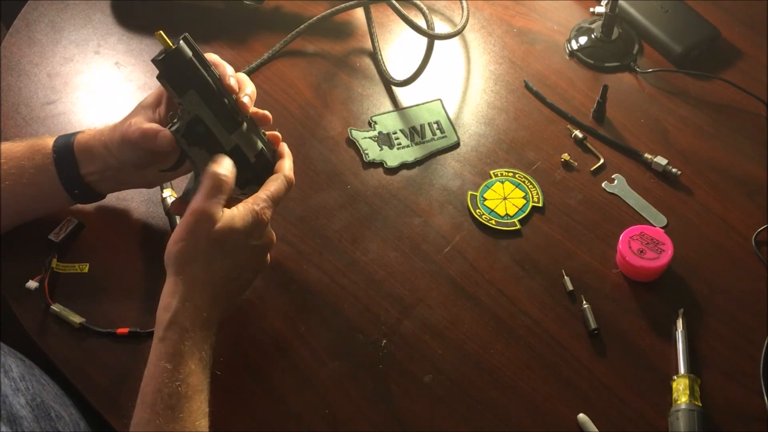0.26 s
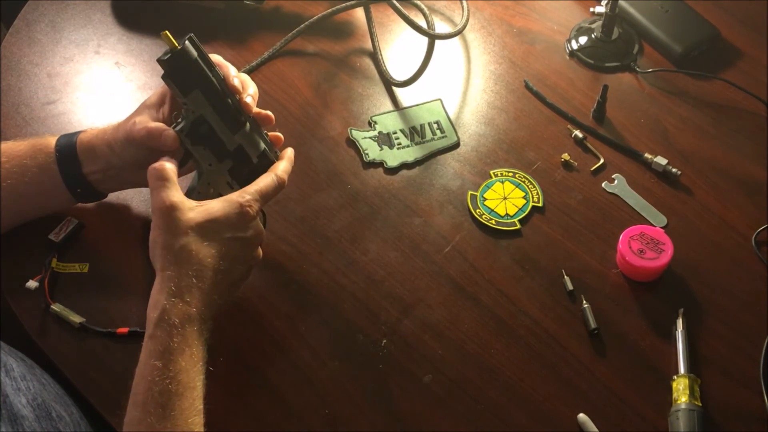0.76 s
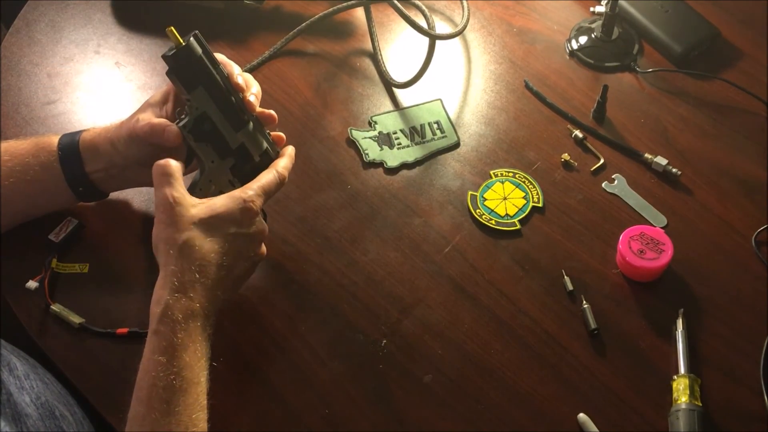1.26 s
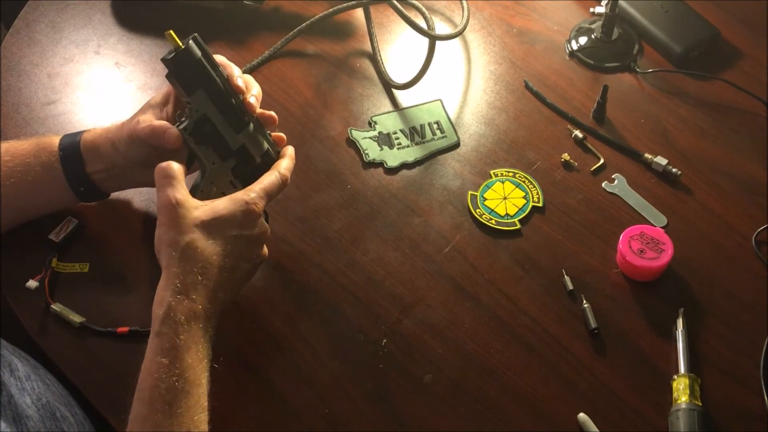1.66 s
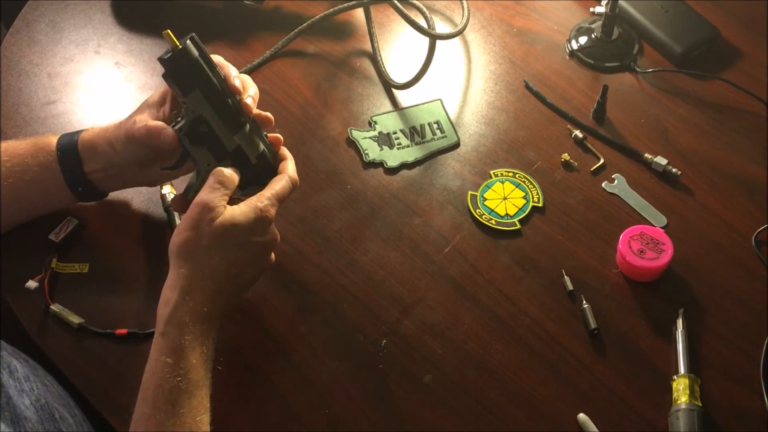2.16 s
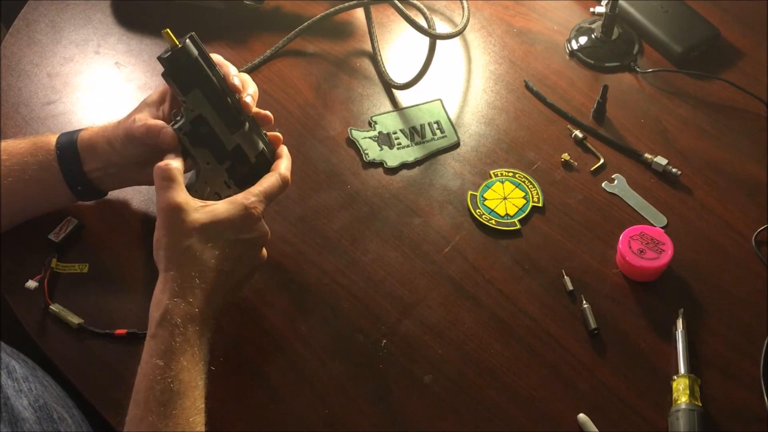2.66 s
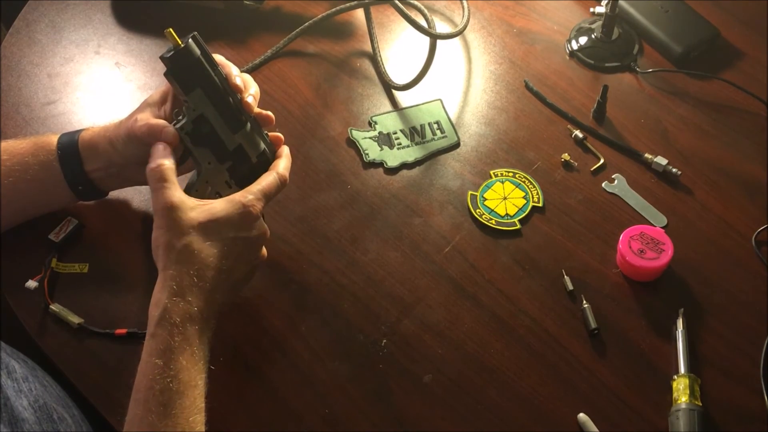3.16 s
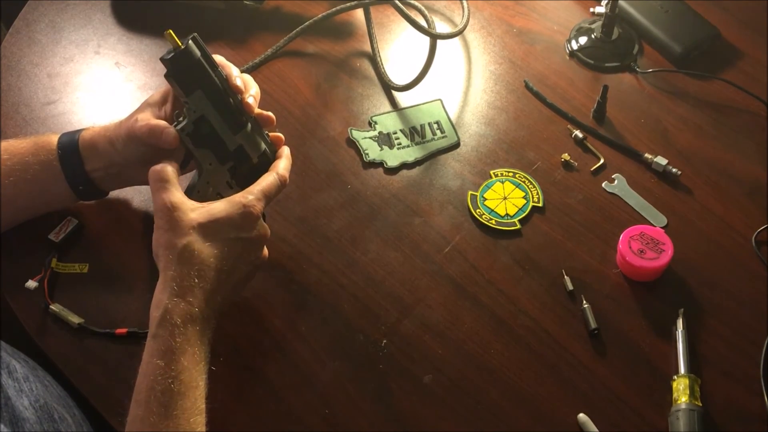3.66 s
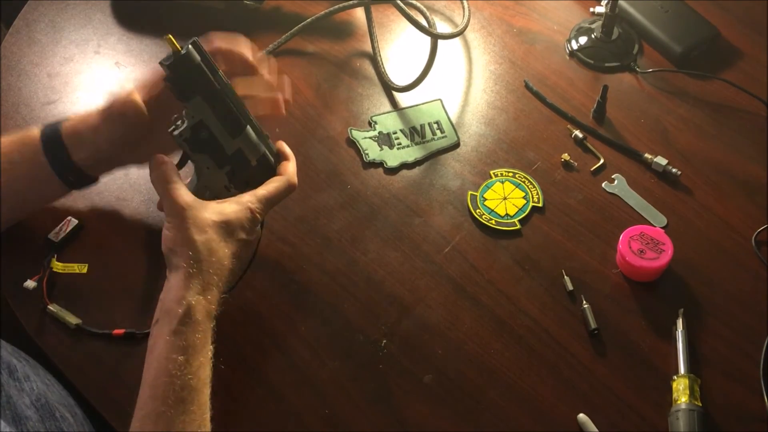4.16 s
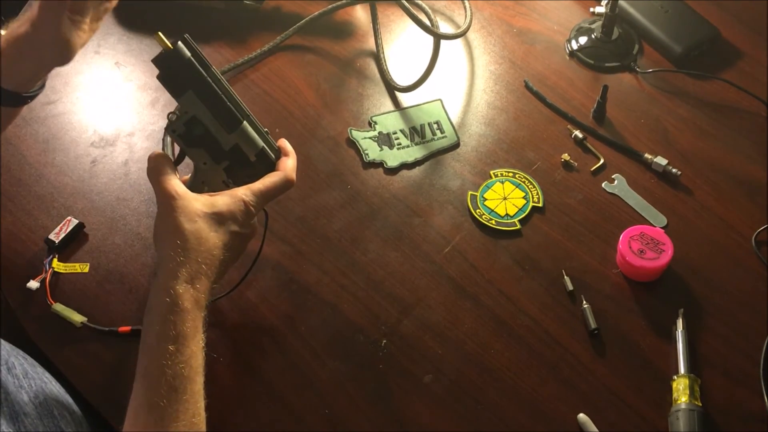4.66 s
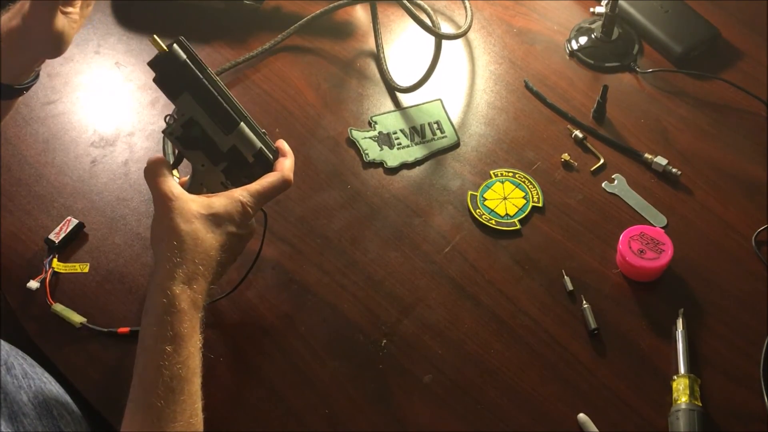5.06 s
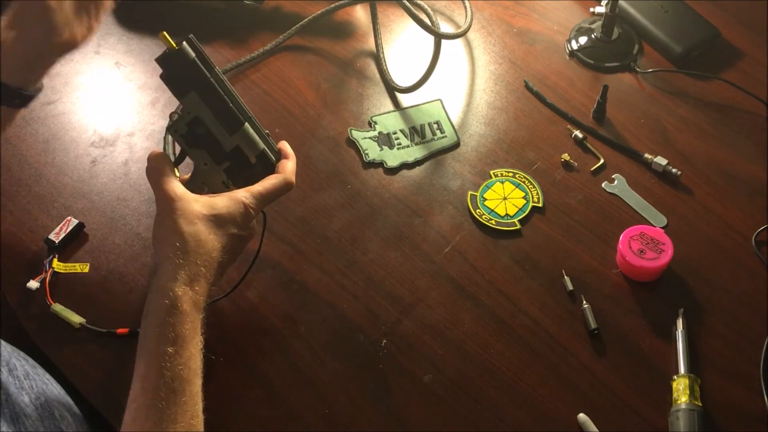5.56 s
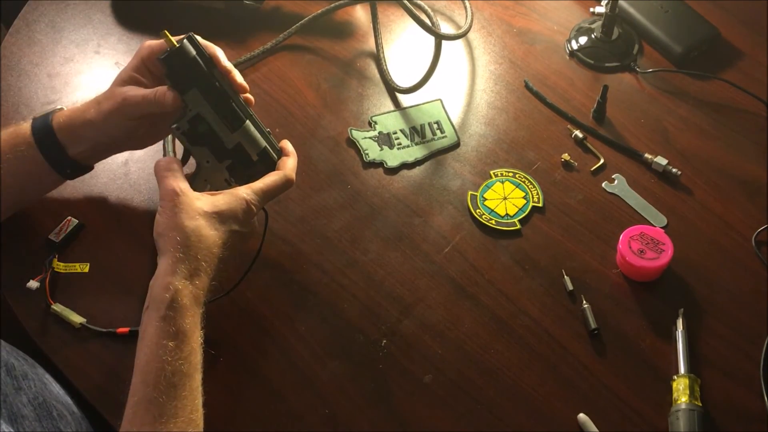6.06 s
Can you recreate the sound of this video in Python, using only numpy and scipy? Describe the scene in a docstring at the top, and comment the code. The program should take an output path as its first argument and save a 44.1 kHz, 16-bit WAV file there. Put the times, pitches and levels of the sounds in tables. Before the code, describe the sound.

Close to the microphone in a small room, an air-powered airsoft gun is dry-fired in the hands. Four single shots snap and hiss, a tiny trigger click follows, then two rapid three-shot bursts. A hand rubs softly off the housing, and four more bursts follow, the middle ones with heavy low wind thumps. Faint rumble and fan sit beneath.

```python
"""An air-driven airsoft engine is dry-fired in the hand above a wooden desk, over room rumble and a faint fan.
First come four single shots, then a trigger let go, two bursts of three, a hand rubbing the housing, four more bursts.
The front hand is away for the first three of those four; two of them carry the strongest pressure waves.
Each pull: valve and nozzle click, then fixed-rate shots of filtered noise (air) and struck modes (housing).
Each shot also sends a slowing swing of pressure over the microphone; a small room answers, a limiter holds peaks."""
import sys
import numpy as np
from scipy import signal
from scipy.fft import rfft, irfft
from scipy.io import wavfile
from scipy.ndimage import uniform_filter1d, minimum_filter1d

SR = 44100
rng = np.random.default_rng(int(sys.argv[2]) if len(sys.argv) > 2 else 0)


def wav_out(sig):
    """Save sig, one row per channel (or a flat mono array), as 16-bit PCM at SR to the path in sys.argv[1]."""
    wavfile.write(sys.argv[1], SR, np.round(np.clip(np.atleast_2d(sig).T, -1, 1) * 32767).astype(np.int16))


N = 279168
TIME_S = np.arange(N) / SR
AGE_S = TIME_S[:SR // 4]

# Trigger pulls. Each row: start in seconds, shots fired, valve click in relative dB, air jet in relative dB,
# extra pressure wave from aiming near the microphone in dB.
PULLS = [(0.9592, 1, -14, -2, 9.5), (1.3095, 1, -14.5, -1, -2), (1.5255, 1, -20, 0, 2.5),
         (1.7063, 1, -18, -1, -1.5), (2.9616, 3, -15.5, 0.5, 0.5), (3.5513, 3, -15, 0.5, -1),
         (4.5385, 3, -15.5, 3.5, 8.5), (4.9726, 3, -20.5, 2.5, 16.5), (5.3407, 3, -22, 2, 18),
         (6.1362, 3, -16, -1, 3.5)]
# Share of that extra wave carried by the first, second and third shot.
WAVE_SHARES = [1, .15, 0.79]
# Front hand cupping the gun. Each row: time in seconds, share (1 cupped, 0 away).
CUPPED_SHARE = [(4.1, 1), (4.3, 0), (5.7, 0), (5.9, 1)]
# Hand slides on the housing. Each row: start in seconds, relative level in dB, rise in seconds, fall in seconds.
RUBS = [(4.028, -33, 0.0011, 0.046), (4.059, -38.5, 0.00089, 0.044), (4.37, -49, .003, .06),
        (4.429, -46.5, 0.0075, 0.091)]
# Trigger let go. Each row: time in seconds, relative level in dB.
TRIGGER_RELEASES = [(2.3454, -38.5)]

# Ringing modes: housing over the desk, hollow between gun, hands and desk, metal parts of the valve.
# Each row: frequency in Hz, relative level in dB, 60 dB decay time in seconds.
HOUSING_MODES = [(525, -4, 0.089), (627, -6, 0.2), (675, -6, 0.22), (768, -6.5, .15), (858, -8, .14),
                 (980, -7, 0.1), (1100, -5, .2)]
HOLLOW_MODES = [(164, -10, 0.29), (190.6, -5, 0.21), (215.3, -2, .18), (246.5, -6.5, 0.26),
                (286, -2.5, 0.2), (331.6, -1, .16)]
VALVE_MODES = [(1330, -4, 0.011), (1640, -0.5, 0.011), (1880, -6, 0.022), (3100, 0, .03), (3520, -2, 0.024),
               (4400, -7, 0.034), (6760, -3, 0.028), (8700, 3, .025)]

# Spectra: air jet, puff eddies at the microphone, housing knock, valve, nozzle stop, nozzle seating,
# skin on the housing, trigger latch, room rumble. Each row: frequency in Hz, relative level in dB.
JET_SPECTRUM = [(150, -30), (600, -15), (1500, -5), (2600, -8), (3700, -0.5), (4900, -0.5), (6300, 1.5),
                (9300, 0.5), (10300, -3), (11800, 0), (15500, -3.5)]
EDDY_SPECTRUM = [(40, -13.5), (90, -7.5), (170, 1), (240, -4), (340, -11), (700, -10), (1500, -18.5),
                 (4000, -32)]
KNOCK_SPECTRUM = [(40, -14.5), (120, -13.5), (195, 3.5), (290, -4), (420, -4), (780, -1.5), (1300, -6),
                  (2600, -6), (4000, -11), (8000, -19.5), (15000, -30.5)]
VALVE_SPECTRUM = [(150, -7), (550, -11), (1500, 0), (2400, -14), (3200, -1), (4800, -12), (6200, -6.5),
                  (9000, -7.5), (12000, -17.5), (16000, -23.5)]
NOZZLE_SPECTRUM = [(200, -16.5), (600, -17.5), (1150, -11), (2500, -6), (4800, -11), (6300, -3),
                   (9000, -4.5), (10300, -14.5), (11500, -7), (16000, -10)]
SEAT_SPECTRUM = [(60, -18), (250, -2), (500, -6), (1300, -11), (2400, -20), (5000, -23), (9000, -13),
                 (15000, -20)]
SKIN_SPECTRUM = [(150, -20.5), (280, -2.5), (620, 1.5), (950, -3.5), (1300, -17), (1700, -12.5),
                 (2800, -33), (9000, -51)]
LATCH_SPECTRUM = [(500, -28.5), (1900, -22.5), (2900, -3), (5200, 0), (7500, -11), (9500, 3), (11500, -18),
                  (16000, -18)]
RUMBLE_SPECTRUM = [(20, -24.5), (32, -7), (46, 3.5), (62, -5.5), (85, -19.5), (125, -20.5), (220, -22),
                   (450, -30), (750, -38.5), (1400, -39), (2600, -46), (4200, -46.5), (7500, -56.5),
                   (15500, -56)]

# Rumble level. Each row: time in seconds, level in dB.
RUMBLE_LEVEL = [(4.4, -48.5), (5.2, -68.5), (5.75, -63.5), (6.1, -45)]
# Fan hum and whine. Each row: frequency in Hz, width in Hz, level in dB.
FAN_BANDS = [(45, 7, -61), (185, 5, -72), (1340, 70, -79), (1730, 110, -82), (3736, 400, -81.5),
             (6430, 520, -83.5), (11400, 60, -91)]
# Near reflections of the room, then its longer tail.
# Each row: frequency in Hz, relative level in dB, 60 dB decay time in seconds.
NEAR_BANDS = [(70, -16.5, .3), (220, -10, 0.27), (600, -7, 0.3), (1490, -11.5, 0.39), (4000, -7.5, 0.27),
              (8100, -6.5, 0.29), (15000, -5, 0.11)]
TAIL_BANDS = [(200, -34.5, 0.63), (1400, -27, 1), (4240, -17.5, 0.68), (7800, -31, 0.99),
              (15000, -42, 0.92)]

# Valve click to first shot, time between shots, time the valve stays open.
DELAY_S, CYCLE_S, OPEN_S = .0434, .0514, .012
# Line pressure sags through a burst: each further shot is weaker and vents for longer.
JET_SAG_DB, KNOCK_SAG_DB, OPEN_GROWTH_S = 2.5, 0.73, .0022
# Relative levels of the knock and of the pressure wave that every shot has.
KNOCK_DB, WAVE_DB = -14.5, -20
# Relative to the valve click: nozzle stop in single and burst fire, seating knock.
STOP_SINGLE_DB, STOP_BURST_DB, SEAT_DB = -2.5, 5, -3.5
# Shot level into the near reflections; its change for jet and knock with the front hand away.
NEAR_DB, AWAY_JET_DB, AWAY_KNOCK_DB = -2, -2.5, -7.5
TOP_HZ = 15850


def shots():
    """Every shot of every pull: start s, place in its burst, air jet dB, pressure wave dB."""
    return [(s + DELAY_S + k * CYCLE_S, k, jet_db - k * JET_SAG_DB, WAVE_DB + aim_db * WAVE_SHARES[k])
            for s, count, _, jet_db, aim_db in PULLS for k in range(round(count))]


def jet(rise_s=0.0004, close_s=0.0028, drain_s=0.026, drain_db=-12, cupped_db=8, flutter_db=2.5):
    """Air rushes out while the valve is open, then the chamber drains; cupped, more of the hiss lingers."""
    flow = np.zeros(N)
    for s, k, db, _ in shots():
        shut_s = np.maximum(AGE_S - OPEN_S - k * OPEN_GROWTH_S, 0)
        share = min(undb(drain_db + cupped_db * cupped(s)), 1)
        closing = (1 - share) * np.exp(-shut_s / close_s)
        draining = share * np.exp(-shut_s / drain_s)
        gate = (1 - np.exp(-AGE_S / rise_s)) * (closing + draining)
        add(flow, s, undb(db - 9.5) * gate)
    turbulence = unit(uniform_filter1d(rng.standard_normal(N), size=60))
    return colour(noise(flow * undb(flutter_db * turbulence)), JET_SPECTRUM)


def knocks(rebound_s=.0048, rebound_db=-1):
    """The piston slams home and rebounds; the housing rings, and so does the hollow while the hand closes it."""
    rattle, force = np.zeros((2, N))
    for s, k, _, _ in shots():
        db = KNOCK_DB - k * KNOCK_SAG_DB
        rebound_lag_s = rebound_s * (1 + .15 * rng.standard_normal())
        for lag_s, blow_db in ((0, db), (rebound_lag_s, db + rebound_db)):
            blow = click(fall_s=0.0045, tail_db=-20.0 + 4.2 * cupped(s), tail_s=.027)
            add(rattle, s + lag_s, undb(blow_db + 5.5) * blow)
        add(force, s, undb(db) * push(width_s=0.00011))
    closed = cupped(TIME_S)
    housing = undb(-7.5 + 3 * closed) * ring(force, HOUSING_MODES)
    hollow = undb(1.0) * ring((force + 0.17 * rattle) * closed, HOLLOW_MODES)
    return colour(rattle, KNOCK_SPECTRUM) + housing + hollow


def buffets(start_hz=670, end_hz=20, glide_s=.0009, cupped_glide_s=.00055, hold_s=0.0042, fall_s=0.012,
            eddy_s=.004, lead_s=0.0015, lead_db=-6):
    """A short low swell leads into each shot's pressure swing, which slows as it fades, with eddies on top."""
    swell = np.exp(-np.maximum(AGE_S - hold_s, 0) / fall_s)
    wave, eddies = np.zeros((2, N))
    for s, _, _, db in shots():
        # Cupped, the swing slows sooner and the eddies are weaker.
        slowing_s = glide_s + (cupped_glide_s - glide_s) * cupped(s)
        slowing_s *= np.exp(0.09 * rng.standard_normal())
        hz = end_hz + (start_hz - end_hz) / (1 + AGE_S / slowing_s)
        lead = np.exp(-(2 * (AGE_S / lead_s - 1)) ** 2)
        add(wave, s - 2 * lead_s, undb(db + lead_db) * lead)
        add(wave, s, undb(db + 0.5) * swell * np.sin(2 * np.pi * np.cumsum(hz) / SR))
        add(eddies, s, undb(.5 * db - 9.0 - 2.6 * cupped(s)) * noise(push(width_s=eddy_s)))
    return wave + colour(eddies, EDDY_SPECTRUM)


def mechanism(stop_s=.0061, seat_s=.0187, crack_s=.0405):
    """Valve snaps and rings, nozzle hits its stop and seats, air begins to leak just before the shot."""
    snap, valve, nozzle, seat = np.zeros((4, N))
    for s, count, db, _, _ in PULLS:
        stop_db = STOP_BURST_DB if round(count) > 1 else STOP_SINGLE_DB
        add(snap, s, undb(db + 2.5) * push(width_s=.00003))
        add(valve, s, undb(db - 7.0) * click(fall_s=0.0012, tail_db=-10.5, tail_s=0.02))
        add(nozzle, s + stop_s, undb(db + stop_db) * click(fall_s=0.0005, tail_db=-17.5, tail_s=0.063))
        add(seat, s + seat_s, undb(db + SEAT_DB) * click(fall_s=0.0018, tail_db=-6.5, tail_s=0.0062))
        add(nozzle, s + crack_s, undb(db - 2.5) * click(fall_s=0.0022, tail_db=-10.5, tail_s=0.0068))
    contacts = colour(valve, VALVE_SPECTRUM) + colour(nozzle, NOZZLE_SPECTRUM) + colour(seat, SEAT_SPECTRUM)
    hollow = undb(-23.5) * ring(seat * cupped(TIME_S), HOLLOW_MODES)
    return contacts + ring(snap, VALVE_MODES) + hollow


def handling(grain_db=2.0):
    """Skin drags over the housing in small slips; the trigger slides and springs back."""
    drag, latch = np.zeros((2, N))
    for s, db, rise_s, fall_s in RUBS:
        stroke = (1 - np.exp(-AGE_S / rise_s)) * np.exp(-(AGE_S / fall_s) ** 2)
        add(drag, s, undb(db - 4.5) * noise(stroke))
    slips = undb(grain_db * unit(uniform_filter1d(rng.standard_normal(N), size=120)))
    for s, db in TRIGGER_RELEASES:
        add(latch, s - .018, undb(db - 19.0) * noise(push(width_s=0.017)))
        add(latch, s, undb(db) * click(fall_s=0.0017, tail_db=-18.0, tail_s=0.013))
    return colour(drag * slips, SKIN_SPECTRUM) + colour(latch, LATCH_SPECTRUM)


def reverberate(x, bands, gap_s, build_s, wander_hz=.3):
    """Diffuse reflections; as the gun wanders, one pattern of them blends into another."""
    t = TIME_S[:SR]
    hz = np.fft.rfftfreq(SR, 1 / SR)
    scatter = rfft(rng.standard_normal((2, SR)))
    responses = np.zeros((2, SR))
    for k, (_, db, t60_s) in enumerate(bands):
        # Overlapping bands: share is 1 at this band's frequency, 0 at its neighbours'.
        share = along(hz, [(row[0], j == k) for j, row in enumerate(bands)])
        decay = undb(-60 * t / t60_s) * (1 - np.exp(-np.maximum(t - gap_s, 0) / build_s))
        responses += undb(db) * irfft(scatter * share) * decay / np.linalg.norm(decay)
    turn = 2 * np.pi * wander_hz * TIME_S
    blends = np.cos(turn), np.sin(turn)
    return sum(signal.fftconvolve(x * blend, response)[:N] for blend, response in zip(blends, responses))


def background():
    """Low room rumble with the hum and faint whine of a fan, as noise in resonant bands."""
    hz = np.fft.rfftfreq(N, 1 / SR)
    fan = np.zeros(N)
    for centre_hz, width_hz, db in FAN_BANDS:
        resonance = 1 / (1 + (2 * (hz - centre_hz) / width_hz) ** 2)
        fan += undb(db) * unit(irfft(rfft(rng.standard_normal(N)) * resonance, N))
    level_db = np.interp(TIME_S, *np.transpose(RUMBLE_LEVEL))
    return fan + colour(noise(undb(level_db)), RUMBLE_SPECTRUM)


def cupped(s):
    """How far the front hand closes round the gun at time s."""
    return np.interp(s, *np.transpose(CUPPED_SHARE))


def ring(force, modes):
    """Decaying modes of alternating sign, set going by every blow."""
    response = np.zeros(len(AGE_S))
    for k, (hz, db, t60_s) in enumerate(modes):
        response += (-1) ** k * undb(db - 60 * AGE_S / t60_s) * np.cos(2 * np.pi * hz * AGE_S)
    return signal.fftconvolve(force, response / np.linalg.norm(response))[:N]


def click(fall_s, tail_db, tail_s):
    """A hard contact and the short chatter that follows it."""
    return noise(np.exp(-AGE_S / fall_s) + undb(tail_db) * np.exp(-AGE_S / tail_s))


def push(width_s):
    """A smooth one-sided force pulse of height 1, peaking at width_s."""
    return AGE_S / width_s * np.exp(1 - AGE_S / width_s)


def noise(envelope):
    """White noise under an envelope."""
    return envelope * rng.standard_normal(len(envelope))


def colour(x, points, size=4096):
    """Causal minimum-phase filter of unit power gain with the given spectrum."""
    cepstrum = irfft(np.log(undb(along(np.fft.rfftfreq(size, 1 / SR), points))))
    # Fold the cepstrum onto positive time.
    cepstrum[1:size // 2] *= 2
    cepstrum[size // 2 + 1:] = 0
    response = irfft(np.exp(rfft(cepstrum)))
    return signal.fftconvolve(x, response / np.linalg.norm(response))[:len(x)]


def along(hz, table, axis=1):
    """Read one column of a table on a log-frequency axis."""
    table = np.asarray(table, float)
    return np.interp(np.log(np.maximum(hz, 1)), np.log(table[:, 0]), table[:, axis])


def add(track, s, sound):
    """Mix a sound into the track at s seconds."""
    i = int(s * SR)
    track[i:i + len(sound)] += sound[:N - i]


def unit(x):
    """Scale to rms 1."""
    return x / np.sqrt(np.mean(x ** 2))


def undb(db):
    """Decibels to gain."""
    return 10 ** (np.asarray(db) / 20)


def scene():
    """Gun and hands in the room; with the hand away, less of the shot is thrown back from close by."""
    air, body, small = jet(), knocks(), mechanism() + handling()
    direct = air + body + small
    away = 1 - cupped(TIME_S)
    thrown = air * undb(AWAY_JET_DB * away) + body * undb(AWAY_KNOCK_DB * away)
    near = reverberate(undb(NEAR_DB) * thrown + small, NEAR_BANDS, gap_s=0.004, build_s=0.0031)
    far = reverberate(direct, TAIL_BANDS, gap_s=0.0058, build_s=0.0071)
    return (direct + near + far + buffets() + background())[None]


def record(dry, ceiling=0.85):
    """A fast look-ahead limiter holds the peaks, then a steep low-pass cuts the top."""
    gain = minimum_filter1d(ceiling / np.maximum(np.abs(dry), ceiling), size=45)
    limited = dry * uniform_filter1d(gain, size=45)
    return signal.sosfilt(signal.ellip(12, .2, 70, TOP_HZ, fs=SR, output="sos"), limited)


dry = scene()
out = record(dry)
wav_out(out)
```